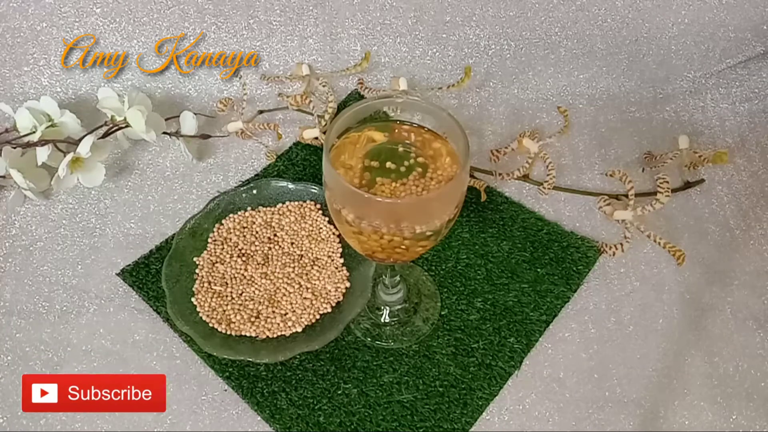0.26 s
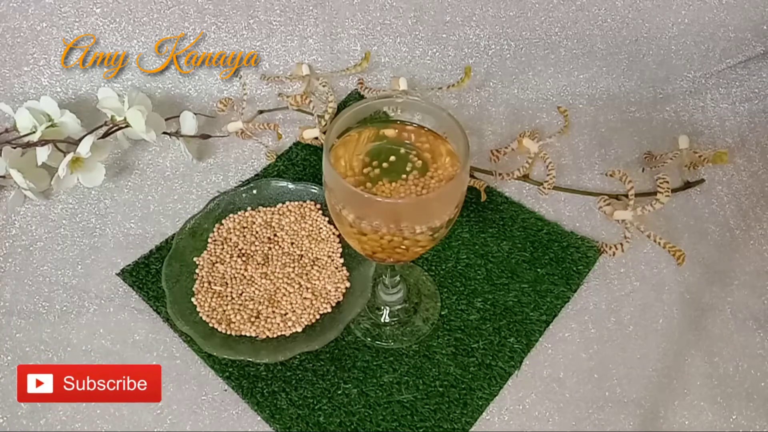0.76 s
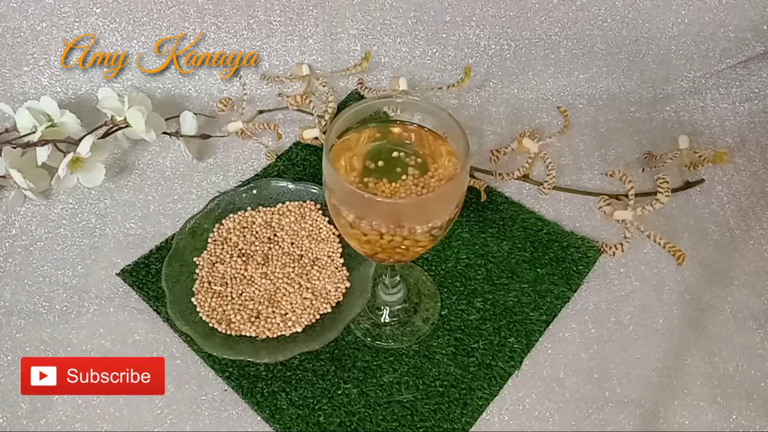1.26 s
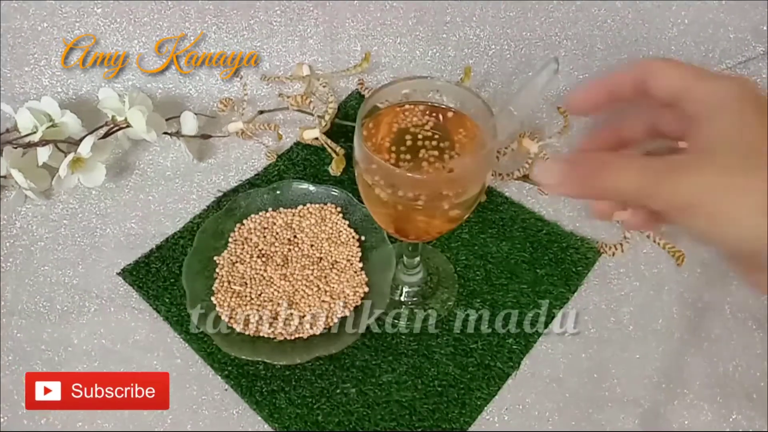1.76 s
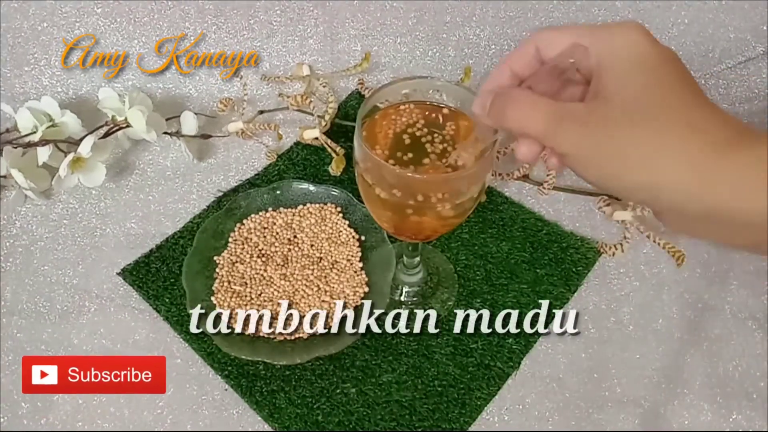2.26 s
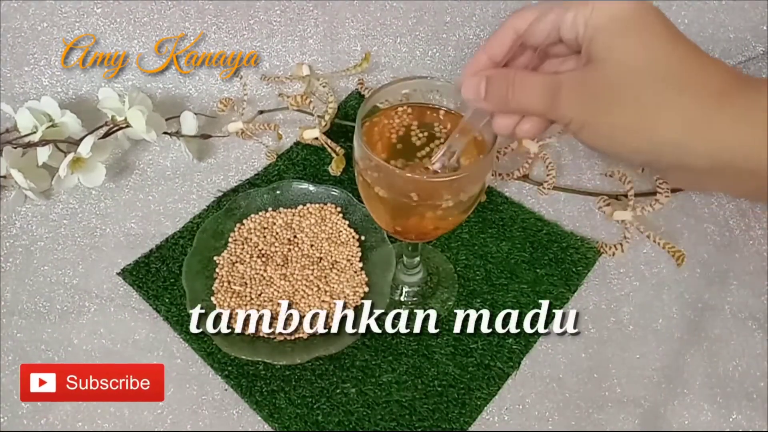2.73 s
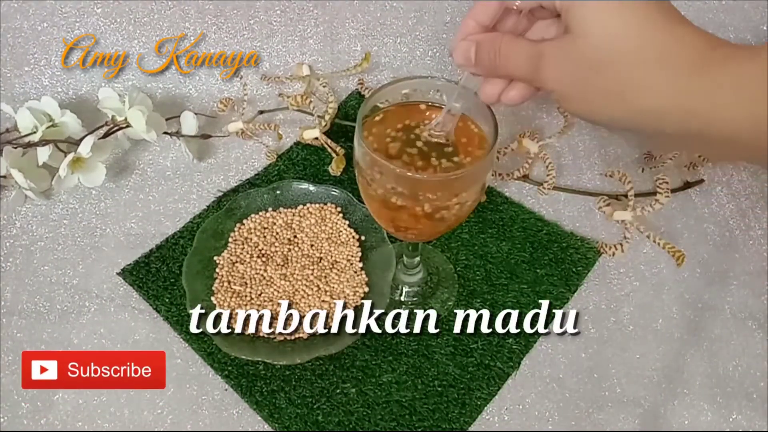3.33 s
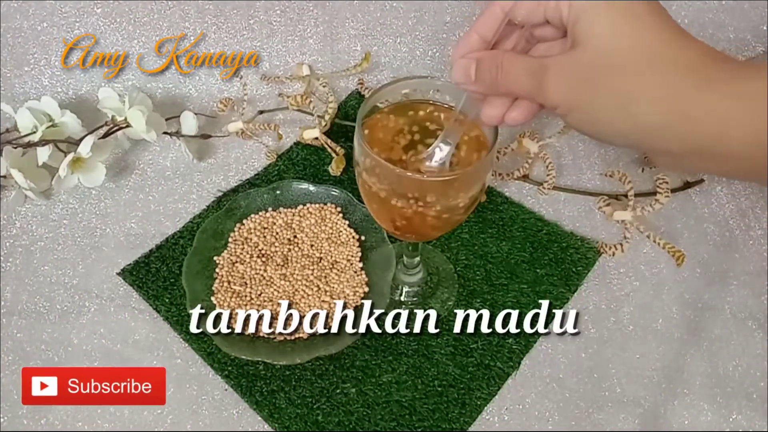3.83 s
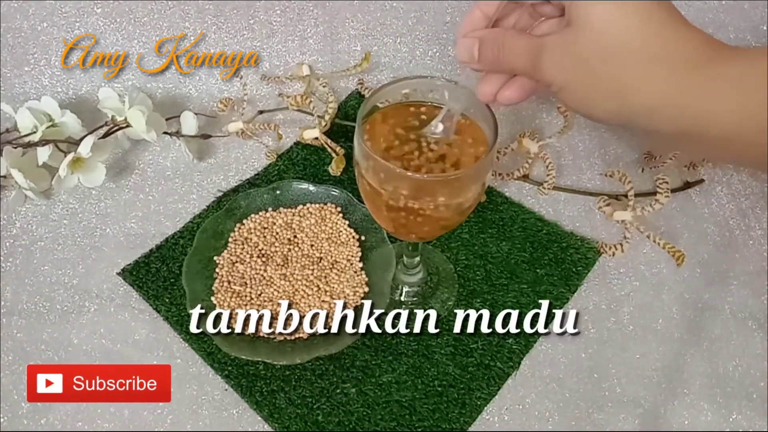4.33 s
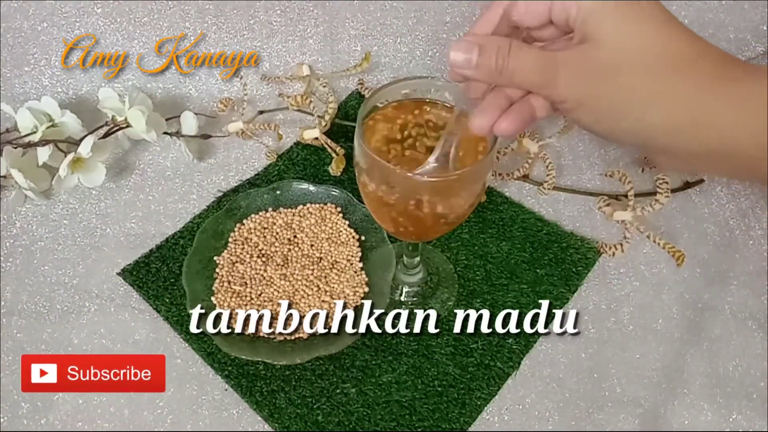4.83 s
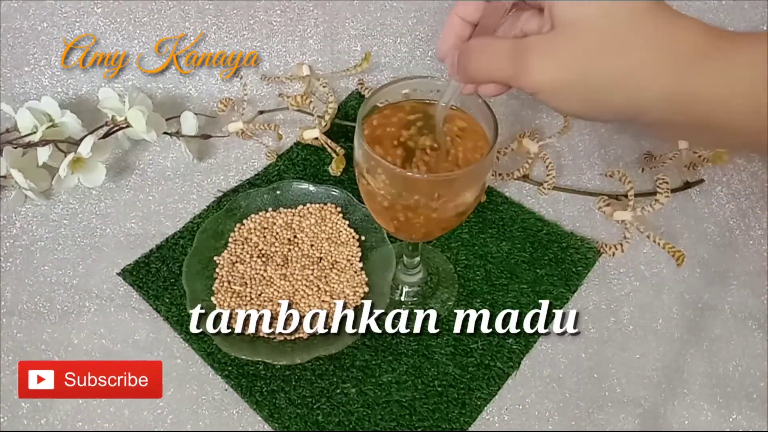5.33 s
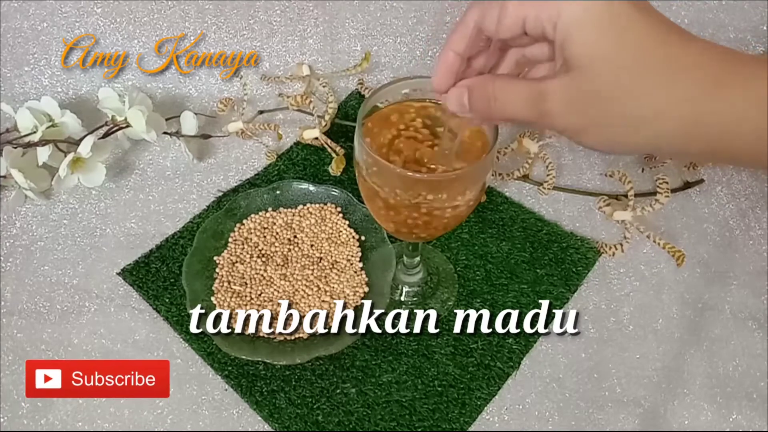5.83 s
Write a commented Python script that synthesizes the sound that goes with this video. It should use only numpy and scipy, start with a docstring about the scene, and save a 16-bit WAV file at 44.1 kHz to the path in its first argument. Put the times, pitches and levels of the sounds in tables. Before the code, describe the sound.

Water boils hard with dense bubbling, breaks off abruptly into a brief silence with a tiny tick, then fades back in as a softer, hissier simmer.

```python
"""At a kitchen stove, water boils in a metal pot: bubbles burst as rising notes, hissing spray is shaped
noise, and both excite the resonant air modes of the pot over a low rumble of filtered noise.
A rolling boil breaks off after a second and a half; past a short pause with a faint tick, a gentler,
hissier simmer fades in. A delayed copy from a close, moving surface combs the simmer's bubbling and hiss.
Larger bursts, low glugs and snaps of flung droplets stand out."""
import sys
import numpy as np
from scipy import signal
from scipy.fft import rfft, irfft
from scipy.io import wavfile
from scipy.ndimage import uniform_filter1d, map_coordinates

SR = 44100
rng = np.random.default_rng(int(sys.argv[2]) if len(sys.argv) > 2 else 0)


def unload_audio(sound):
    """Save the sound as a 16-bit wav file, at the path given as the first command line argument."""
    columns = np.transpose(np.atleast_2d(sound))
    # keep every value between -1 and 1, then stretch to whole-number steps
    steps = np.round(np.clip(columns, -1, 1) * 32767)
    wavfile.write(sys.argv[1], SR, steps.astype(np.int16))


N = 268128
TIME = np.arange(N) / SR   # seconds
BRIEF = TIME[:2600]        # time axis of one short event, 59 ms
FADE_FROM_S = 1.635        # the boil's layers end and the simmer's begin
LEAD_S = 0.015             # froth starts this long before its burst

# Colour of the simmer's spray. Each row: frequency in Hz, spectral level in dB per Hz.
SIMMER_SPRAY_COLOUR = [(150, -24), (320, -5.5), (680, -39.5), (1100, 1.5), (2300, 2), (3400, 5.5),
                       (4300, 3.5), (5500, 8), (6300, 0.5), (7300, 6.5), (8000, -0.5), (9800, 2),
                       (13800, -13.5), (14600, -0.5), (16000, -1.5)]


def from_db(db):
    """Level to amplitude: 20 dB is a factor of ten."""
    return 10 ** (np.asarray(db) / 20)


def rms_one(x):
    """Normalisation to unit root-mean-square."""
    return x / np.sqrt(np.mean(x ** 2) + 1e-20)


def peak_one(x):
    """Normalisation to unit peak."""
    return x / (np.abs(x).max() + 1e-20)


def burst_one(x):
    """Short-time normalisation: the loudest 2 ms get the power of a sine of amplitude 1."""
    power = uniform_filter1d(x ** 2, size=SR // 500)
    return x / np.sqrt(2 * power.max() + 1e-20)


def in_time(rows):
    """Linear interpolation: each column becomes a curve with one value a sample."""
    seconds, *columns = np.transpose(rows)
    return [np.interp(TIME, seconds, column) for column in columns]


def at_hz(points, hz):
    """Interpolation of a spectrum in dB on a logarithmic frequency axis."""
    points_hz, points_db = np.transpose(points)
    return np.interp(np.log(hz + 1e-9), np.log(points_hz), points_db)


def add(out, start_s, sound):
    """Superposition: a short sound is summed in at its start time."""
    at = int(np.clip(start_s * SR, 0, N - 1))
    out[at:at + len(sound)] += sound[:N - at]


def coloured(x, spectrum, size=4096):
    """Minimum-phase filtering: folding the cepstrum makes a causal response of the given spectrum."""
    log_gain = np.log(from_db(at_hz(spectrum, np.fft.rfftfreq(size, 1 / SR))))
    cepstrum = irfft(log_gain)
    cepstrum[1:size // 2] *= 2
    response = irfft(np.exp(rfft(cepstrum[:size // 2], size)))
    return signal.fftconvolve(x, response)[:len(x)]


def drift(rate):
    """Low-passed noise: a random curve of unit rms with about `rate` turns a second."""
    white = rfft(rng.standard_normal(N))
    low_pass = 1 / (1 + (np.fft.rfftfreq(N, 1 / SR) / rate) ** 2)
    return rms_one(irfft(white * low_pass, N))


def stove():
    """Broadband low rumble: filtered noise of unsteady level, growing under the simmer, with soft bumps."""
    # Colour of the rumble. Each row: frequency in Hz, spectral level in dB per Hz.
    rumble_colour = [(20, -20), (42, -26), (62, -11.5), (85, -1), (125, 0), (160, 0), (200, -10),
                     (260, -20), (500, -27), (1500, -27)]
    # Soft, deep bumps. Each row: time in seconds (10 ms after the start), peak level in dB, pitch in Hz.
    bumps = [(0.704, -60, 116), (1.308, -62.5, 88), (4.069, -64, 107), (4.494, -58.5, 91),
             (5.676, -58.5, 87.5), (6.025, -62, 93.5)]
    boil_db, simmer_start_db, rise_db_per_s = -72, -73, 0.63
    simmer_db = simmer_start_db + rise_db_per_s * (TIME - FADE_FROM_S)
    level_db = np.where(TIME < FADE_FROM_S, boil_db, simmer_db)
    rumble = rms_one(coloured(rng.standard_normal(N), rumble_colour))
    out = from_db(level_db + 1.4 * drift(13)) * rumble
    for time_s, peak_db, hz in bumps:
        bump = np.hanning(len(BRIEF)) * np.sin(2 * np.pi * hz * BRIEF)
        add(out, time_s - 0.01, from_db(peak_db) * bump)
    return out


def kitchen(x, wet_db, t60_s):
    """Reverberation: a short diffuse tail of noise decays exponentially, 60 dB in t60_s."""
    t = TIME[:SR // 2]
    tail = rng.standard_normal(len(t)) * from_db(-60 * t / t60_s)
    tail *= t > 0.005   # the tail starts 5 ms after the direct sound
    return x + from_db(wet_db) * signal.fftconvolve(x, tail / np.linalg.norm(tail))[:N]


def near_echo(x):
    """Comb filtering: two bounces off a close, moving surface; the gap's resonance lifts the lower treble."""
    # Echo off the surface. Each row: time in seconds, delay in ms, strength from 0 to 1.
    echo_path = [(2.0, 0.14, 0.33), (2.3, 0.13, 0.7), (2.5, 0.14, 0.4), (4.2, 0.14, 0.48),
                 (4.35, 0.18, 0.7), (4.47, 0.25, 0.47), (4.58, 0.33, 0.32), (4.75, 0.37, 0.74),
                 (4.97, 0.48, 0.37), (5.15, 0.46, 0.33), (5.6, 0.44, 0.63), (5.8, 0.4, 0.5),
                 (5.92, 0.33, 0.7), (6.08, 0.38, 0.1)]
    dull_hz, second_bounce = 6140, 0.15
    gap_hz, gap_q, gap_lift = 3610, 3.2, 0.68
    delay_ms, strength = in_time(echo_path)
    dull = irfft(rfft(x) / (1 + (np.fft.rfftfreq(N, 1 / SR) / dull_hz) ** 4), N)
    delay = delay_ms * SR / 1000   # in samples
    first = map_coordinates(dull, [np.arange(N) - delay], order=3)
    second = map_coordinates(dull, [np.arange(N) - 2 * delay], order=3)
    gap = signal.lfilter(*signal.iirpeak(gap_hz, gap_q, fs=SR), x)
    return x + strength * (first + second_bounce * strength * second + gap_lift * gap)


def pot(x):
    """Cavity resonance: the air in the pot rings on at its modes, each a two-pole resonator."""
    # Air modes of the pot. Each row: frequency in Hz, bandwidth in Hz, lift in dB.
    modes = [(524, 75, 9), (850, 22, 6), (1261, 62, 9), (1512, 22, 6), (1670, 18, -3.5), (2240, 150, 5),
             (2540, 170, -3), (2886, 300, 5), (4860, 260, 2.5), (5780, 390, 1.5), (6660, 410, 3.5)]
    out = x
    for hz, width_hz, lift_db in modes:
        r = np.exp(-np.pi * width_hz / SR)   # pole radius
        poles = [1, -2 * r * np.cos(2 * np.pi * hz / SR), r * r]
        mode = (1 - r * r) / 2 * signal.lfilter([1, 0, -1], poles, x + 1e-18)
        out = out + (from_db(lift_db) - 1) * mode
    return out


def scattered(sound, chance, strength, spread_s):
    """Early reflection: the pot's walls return copies at chance lags, later ones weaker, signs alternating."""
    out = np.concatenate([sound, np.zeros(int(spread_s * SR) + 1)])
    for k, late in enumerate(chance):
        at = int(late * spread_s * SR)
        out[at:at + len(sound)] += (-1) ** k * strength * np.exp(-2 * late) * sound
    return out


def bubble(hz, cycles, rise):
    """Opening resonator: a bubble swells for some cycles and dies, its pitch rising as the hole widens."""
    age = BRIEF * hz / cycles   # 1 at the peak of the swell
    age = age[age < 8]
    swell = age * np.exp(1 - age)
    glide = 1 + rise * np.tanh((age - 1) / 2)   # pitch relative to hz
    phase = 2 * np.pi * cycles * np.cumsum(glide) * age[1]
    return swell * np.sin(phase)


def froth(hz, rise_s, fall_s):
    """Band-limited noise around a bubble's pitch: it gathers as the film drains and dies after the burst."""
    band = signal.butter(2, [hz / 1.45, hz * 1.45], "band", fs=SR, output="sos")
    wet_noise = rms_one(signal.sosfilt(band, rng.standard_normal(len(BRIEF))))
    age = BRIEF - LEAD_S   # 0 at the burst
    return np.exp(np.minimum(age / rise_s, -age / fall_s)) * wet_noise


def snaps(snap_db, decay_s):
    """Impact: a droplet hits with one sharp, bright click and a very short, decaying splatter."""
    # Dry snaps of flung droplets. Each row: start in seconds, peak level in dB before snap_db is added.
    droplets = [(1.2233, -31), (2.5232, -49), (3.4448, -63), (5.2423, -30), (5.3108, -42), (5.3524, -29),
                (5.444, -41), (5.4991, -27), (5.566, -39), (5.9525, -40)]
    out = np.zeros(N)
    band = signal.butter(1, [1850, 4200], "band", fs=SR, output="sos")
    for start_s, peak_db in droplets:
        splatter = 0.46 * np.exp(-BRIEF / decay_s) * rng.standard_normal(len(BRIEF))
        hit = pot(signal.sosfilt(band, signal.unit_impulse(len(BRIEF)) + splatter))
        add(out, start_s, from_db(peak_db + snap_db) * peak_one(hit))
    return out


def glugs(blip_db, trail_db, trail_s, slosh_db):
    """Size sets pitch: large steam bubbles break in a low, rising blip and a slosh; higher ones follow."""
    # Biggest bubbles. Each row: start in seconds, level in dB before the part's own level
    # is added, pitch in Hz, cycles to swell.
    big_bubbles = [(0.099, -55.5, 500, 0.78), (0.287, -42.5, 760, 1.8), (0.438, -49.5, 876, 2),
                   (0.521, -45.5, 940, 1.3), (0.642, -49, 815, 2.4), (0.6748, -42.5, 775, 2.3),
                   (0.976, -44, 686, 0.88), (1.059, -59, 540, 0.91), (1.131, -50, 790, 2.6),
                   (1.187, -41.5, 464, 1), (1.191, -43, 890, 1.4), (1.264, -53, 566, 1.2),
                   (1.319, -44, 905, 0.83), (1.367, -52, 840, 1.9), (1.4505, -43, 835, 2.3),
                   (1.729, -58, 530, 1.3), (1.997, -58, 850, 3.3), (2.124, -58.5, 527, 0.63),
                   (2.166, -59, 835, 3.1), (2.621, -68, 460, 1.2), (2.728, -47.5, 920, 1.7),
                   (2.817, -64, 860, 2.5), (3.237, -52.5, 470, 1.5), (3.311, -64, 503, 1.5),
                   (3.415, -55, 870, 2), (3.443, -54, 860, 4.3), (3.385, -67, 560, 1.5),
                   (3.614, -58.5, 473, 1.1), (3.69, -58, 554, 0.92), (4.154, -49.5, 1000, 1.2),
                   (4.163, -60.5, 571, 1.2), (4.48, -63, 422, 0.76), (4.507, -65, 450, 2.1),
                   (4.763, -57.5, 880, 1.7), (4.903, -54.5, 790, 1.2), (4.949, -65, 466, 1.1),
                   (5.06, -60, 500, 2.4), (5.341, -61.5, 780, 1.6), (5.6, -57.5, 478, 1.1),
                   (5.92, -63.5, 530, 1.1)]
    out = np.zeros(N)
    for start_s, level_db, hz, cycles in big_bubbles:
        blip = scattered(bubble(hz, cycles, rise=0.14), rng.random(5), strength=0.72, spread_s=0.0101)
        slosh = froth(hz, rise_s=0.0023, fall_s=0.009)
        add(out, start_s, from_db(level_db + blip_db) * peak_one(blip))
        add(out, start_s - LEAD_S, from_db(level_db + slosh_db) * slosh)
        for late, smaller in rng.random((3, 2)):
            follower = bubble(hz * (1 + smaller), cycles=1.4, rise=0.12)
            add(out, start_s + late * trail_s, from_db(level_db + trail_db) * follower)
    return out


def pops(bubble_db, froth_db, click_db, ring_db, puff_db, puff_s):
    """Film rupture: froth gathers, then a click, the bubble's note, a puff of spray and an air mode sound."""
    # Bursts that stand out. Each row: start in seconds, height in dB, bubble pitch in Hz, then spray and
    # pot ring in dB relative to the height; each part's own level is added to these.
    bursts = [(0.058, -35, 1530, -2, -4), (0.076, -42, 2340, 5, -23), (0.196, -43.5, 1300, -20, 9),
              (0.2704, -29.5, 2220, -26, -36), (0.3142, -35, 2520, -16, -30),
              (0.3824, -28.5, 3240, -30, -36), (0.388, -17, 2640, -39, -21), (0.41, -32, 1680, -26, 0),
              (0.439, -30.5, 3470, -3.5, -29), (0.47, -26.5, 2160, -9.5, -16),
              (0.509, -28, 2760, -21, -8.5), (0.516, -29, 2930, -18, -22), (0.551, -28.5, 1870, -15, -12),
              (0.566, -35.5, 1390, -14, 2), (0.6093, -32, 2800, -24, -30), (0.655, -24.5, 2620, -9.5, -14),
              (0.679, -29.5, 2470, 0, -20), (0.689, -25.5, 2760, -11, -13), (0.7602, -22.5, 2540, -20, -17),
              (0.767, -30, 2710, -22, -25), (0.791, -28.5, 2620, -17, -20), (0.8227, -30.5, 2490, -18, -32),
              (0.9147, -28, 1750, -11, -1.5), (0.931, -31, 1410, -6, -8), (0.9722, -29.5, 2240, -26, -13),
              (1.032, -26.5, 1980, -6.5, -18), (1.077, -24, 1730, -28, -31), (1.096, -27.5, 1880, -9, -19),
              (1.1304, -33.5, 1310, -21, -12), (1.158, -26.5, 1910, -4, -22), (1.2211, -30, 2630, -5, -4.5),
              (1.264, -30, 1560, -25, -15.5), (1.289, -28, 2090, 2, 1), (1.3419, -26, 2500, -10, -17),
              (1.3513, -30.5, 2550, -5, -20), (1.378, -26, 2330, -24, -16), (1.4105, -33, 2700, -19, 3.5),
              (1.4544, -28.5, 2150, -13, -10.5), (1.473, -35, 1950, -28.5, -27.5),
              (1.793, -44, 1400, -9, -9), (1.85, -54.5, 1320, 14.5, -20), (1.908, -39.5, 5050, -13, -16),
              (1.978, -54.5, 1430, 15, -19), (2.035, -36.5, 1357, -22, -20), (2.083, -42, 2170, -1, -13),
              (2.126, -43.5, 1400, -2, -23), (2.174, -43, 3000, -12, -24), (2.337, -47, 2360, -14, -10),
              (2.358, -39.5, 3200, -1, -22), (2.521, -40.5, 2820, 2, -14), (2.571, -44.5, 1260, 2, 1.5),
              (2.726, -41.5, 1700, -19, -7), (2.767, -43, 1290, -12, -6), (2.81, -39.5, 1378, -13, -21),
              (2.93, -47, 1610, -15, -20), (2.9432, -36, 6860, -9, -14.5), (2.997, -46, 1250, -16, -5),
              (3.013, -43.5, 1340, 6.5, -16), (3.068, -41.5, 1220, -2, -1.5), (3.157, -46, 2500, 6.5, -21),
              (3.184, -41, 4480, -6, -8), (3.23, -45, 1180, -15, -5), (3.284, -45, 1430, -14, -14),
              (3.3599, -45, 1260, 1, -2.5), (3.406, -44, 2870, -13, -10), (3.4434, -41, 1410, -15, -2.5),
              (3.539, -43.5, 1230, 2, -4.5), (3.6434, -41.5, 2090, 0, -9), (3.704, -43, 1130, 4, -13),
              (3.734, -42, 1330, -12, -17), (3.7825, -41.5, 3150, 4, -26), (3.937, -44.5, 1170, 7.5, -22),
              (4.004, -44.5, 6570, 8, -16), (4.092, -45, 1120, -8, -15), (4.23, -42, 1220, -14, -10),
              (4.3147, -38.5, 3940, -18, -35), (4.362, -43.5, 3920, 0.5, -16), (4.455, -40, 5070, -2, -13),
              (4.513, -41, 2800, -2, -19), (4.588, -36, 3140, -5, -35), (4.602, -38, 2650, -8, -22),
              (4.687, -36.5, 2720, -9, -19), (4.8224, -38, 4640, -1, -23), (4.838, -38.5, 1700, -20, -26),
              (4.891, -37, 1530, -25, -31), (4.951, -40.5, 1950, -23, -27), (4.997, -42, 7100, -1, -33),
              (5.149, -39.5, 3080, 4, -10), (5.2436, -31.5, 2700, -16, -17.5), (5.31, -45, 6761, 10, -26),
              (5.329, -40, 3640, -2, -17), (5.35, -35.5, 2400, -20, -24), (5.4968, -39.5, 2300, 9.5, -8.5),
              (5.589, -38, 2880, -3, -37), (5.623, -39.5, 2730, 3.5, -12), (5.681, -42, 4060, -16, -27),
              (5.716, -47, 2060, 8, -34), (5.7574, -33.5, 2000, 1.5, -20), (5.8169, -34, 2060, -10, -16.5),
              (5.918, -37, 3000, 4.5, -24), (5.9513, -44.5, 3208, -3, -18), (6.034, -42.5, 2920, 3, -21)]
    # Colour of the click of a tearing film. Each row: frequency in Hz, spectral level in dB per Hz.
    click_colour = [(300, -26), (900, -17.5), (1500, -1.5), (2500, 19), (4200, 0), (7000, -13),
                    (14000, -15.5)]
    mode_hz, mode_t60_s = 1244, 0.056   # the pot's main air mode
    notes, puffs = np.zeros(N), np.zeros(N)
    ring_envelope = (1 - np.exp(-BRIEF / 0.0017)) * from_db(-60 * BRIEF / mode_t60_s)
    puff_envelope = BRIEF / puff_s * np.exp(1 - BRIEF / puff_s)
    click = pot(coloured(signal.unit_impulse(len(BRIEF)), click_colour))
    for start_s, height_db, hz, spray_db, pot_db in bursts:
        tone = bubble(hz, cycles=1.84, rise=0.018)
        note = scattered(tone, rng.random(6), strength=0.74, spread_s=0.0071)
        crack = scattered(click, rng.random(10), strength=0.85, spread_s=0.0045)
        ring_hz = mode_hz * rng.normal(1, 0.022)
        ring = ring_envelope * np.sin(2 * np.pi * ring_hz * BRIEF)
        puff = puff_envelope * rng.standard_normal(len(BRIEF))
        gathering = froth(hz, rise_s=0.004, fall_s=0.004)
        add(notes, start_s, from_db(height_db + bubble_db) * burst_one(note))
        add(notes, start_s - LEAD_S, from_db(height_db + froth_db) * gathering)
        add(notes, start_s, from_db(height_db + click_db) * burst_one(crack))
        add(notes, start_s, from_db(height_db + pot_db + ring_db) * peak_one(ring))
        add(puffs, start_s, from_db(height_db + spray_db + puff_db) * puff)
    return notes + pot(coloured(puffs, SIMMER_SPRAY_COLOUR))


def spray(colour, surge_db, per_s, spread_db, burst_s, haze_db):
    """Shot noise: torn films throw puffs of noise that die in a few ms, over an even haze."""
    size = from_db(spread_db * np.minimum(rng.exponential(1, N), 2.8))
    born = rng.random(N) < per_s / SR
    decay = np.exp(-2 / (burst_s * SR))   # of power, per sample
    power = signal.lfilter([1], [1, -decay], born * size ** 2 + 1e-18)
    height = np.sqrt(power / power.mean() + from_db(haze_db) ** 2) * from_db(surge_db)
    return rms_one(pot(coloured(height * rng.standard_normal(N), colour)))


def bubbling(loudness, surge_db, per_s, spread_db, cycles, most=14000):
    """Random superposition: countless small bubbles burst independently, louder during each surge."""
    out = np.zeros(N)
    count = rng.binomial(most, per_s * N / SR / most)
    for when, pitch, size, life, *walls in rng.random((count, 8)):
        hz = 380 * (11000 / 380) ** pitch   # even spread over log frequency
        level_db = at_hz(loudness, hz) + spread_db * size ** 2 + surge_db[int(when * N)]
        tone = bubble(hz, cycles * (0.5 + life), rise=0.077)
        burst = scattered(tone, walls, strength=1.0, spread_s=0.009)
        add(out, when * N / SR, from_db(level_db) * burst)
    return rms_one(pot(out))


def simmer():
    """Shared modulation: smaller bubbles and a bright, slowly growing sizzle surge together."""
    # Loudness of a bubble by its pitch. Each row: pitch in Hz, relative level in dB.
    loudness = [(380, -19), (700, -22.5), (1100, 7.5), (1500, 7), (2000, 7), (2600, 11.5), (3400, 15),
                (4600, 4.5), (7000, 13.5), (11000, 18)]
    # The bubbling swells and slackens. Each row: time in seconds, level in dB.
    bubbling_level = [(1.9, -59), (3.4, -58.5), (3.85, -61), (4.2, -60), (4.5, -60.5), (4.9, -59.5),
                      (6.08, -57.5)]
    spray_start_db, spray_rise_db_per_s = -59.5, 0.8
    bubbles_db = in_time(bubbling_level)[0]
    spray_db = spray_start_db + spray_rise_db_per_s * (TIME - FADE_FROM_S)
    surge_db = 1.9 * drift(48)
    crowd = bubbling(loudness, surge_db, per_s=2100, spread_db=13, cycles=2.0)
    hiss = spray(SIMMER_SPRAY_COLOUR, surge_db, per_s=400, spread_db=7.0, burst_s=0.0024, haze_db=-2.0)
    return from_db(bubbles_db) * crowd + from_db(spray_db) * hiss


def rolling_boil():
    """Shared modulation: steady, strong bubbling and its spray rise and fall with the same surges."""
    # Loudness of a bubble by its pitch. Each row: pitch in Hz, relative level in dB.
    loudness = [(380, -48), (800, -12.5), (1200, -1), (1800, 8.5), (2600, -6), (3400, 8), (4600, -1.5),
                (7000, 5), (11000, -6.5)]
    # Colour of the spray. Each row: frequency in Hz, spectral level in dB per Hz.
    spray_colour = [(150, -25), (300, -2.5), (650, -20.5), (1100, 1.5), (2050, 14), (2400, 14.5),
                    (2650, 18), (3100, 10), (4200, 7), (4950, 0), (5600, 5), (6300, -5.5), (7300, 3),
                    (8100, -4), (11500, 0), (13800, -14.5), (14800, 0.5), (16000, -4)]
    bubbles_db, spray_db = -50.5, -48
    surge_db = 1.7 * drift(54)
    crowd = bubbling(loudness, surge_db, per_s=1400, spread_db=10.5, cycles=1.8)
    hiss = spray(spray_colour, surge_db, per_s=420, spread_db=5.5, burst_s=0.0026, haze_db=-3)
    return from_db(bubbles_db) * crowd + from_db(spray_db) * hiss


def scene():
    """Superposition of sources: the pot boils hard, then simmers, in a reverberant room over the rumble."""
    water = np.where(TIME < FADE_FROM_S, rolling_boil(), near_echo(simmer()))
    water = water + pops(bubble_db=-6.0, froth_db=-19.5, click_db=-16.0, ring_db=-4.0,
                         puff_db=-13.0, puff_s=0.0015)
    water = water + glugs(blip_db=1.0, trail_db=-12.5, trail_s=0.023, slosh_db=-17.5)
    water = water + snaps(snap_db=-6, decay_s=0.00054)
    return (kitchen(water, wet_db=-15.0, t60_s=0.29) + stove())[None]


def record(dry):
    """Gating and band-limiting: sound breaks off, a tick falls in the pause, sound fades in; the top is cut."""
    break_s, fall_s = 1.478, 0.0023
    fade_to_s, fade_bend = 1.87, 1.72
    tick_s, tick_db = 1.607, -58
    fade_out = np.exp(-np.clip((TIME - break_s) / fall_s, 0, 20))
    fade_in = np.clip((TIME - FADE_FROM_S) / (fade_to_s - FADE_FROM_S), 0, 1) ** fade_bend
    tick = np.zeros(N)
    add(tick, tick_s, from_db(tick_db) * peak_one(signal.firwin(31, 4500, fs=SR)))
    low_pass = signal.ellip(12, 0.2, 70, 15700, fs=SR, output="sos")   # cutoff in Hz
    return signal.sosfilt(low_pass, dry * (fade_out + fade_in) + tick)


dry = scene()
out = record(dry)
unload_audio(out)
```